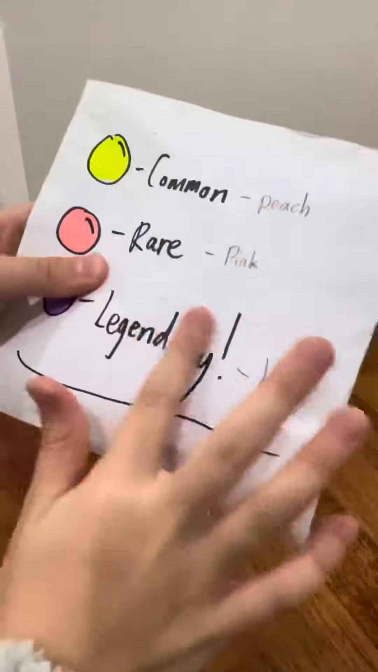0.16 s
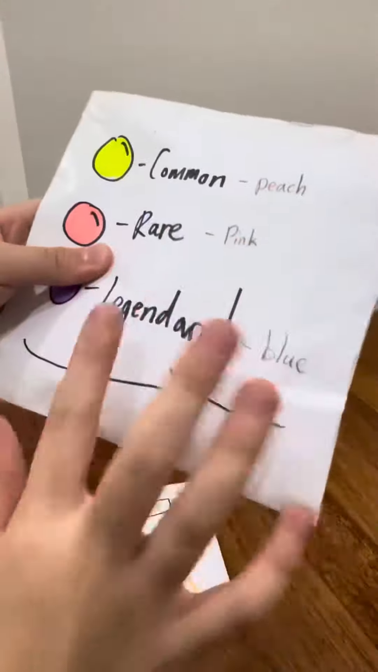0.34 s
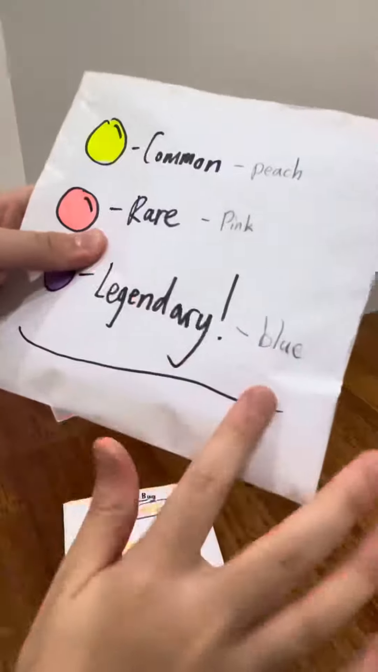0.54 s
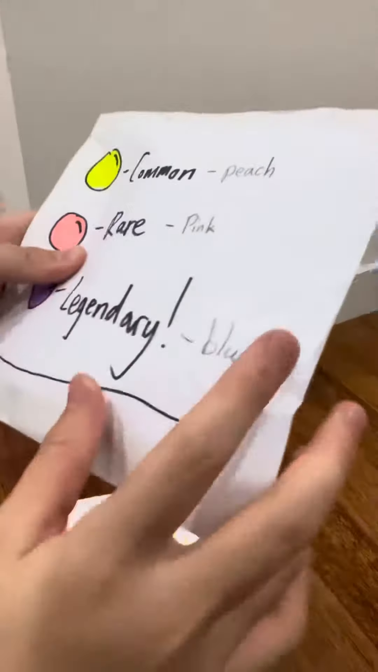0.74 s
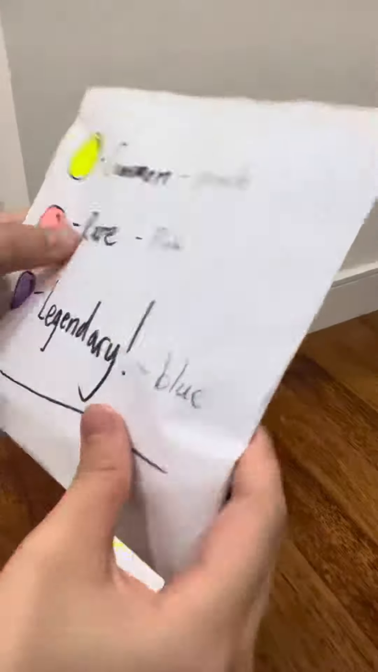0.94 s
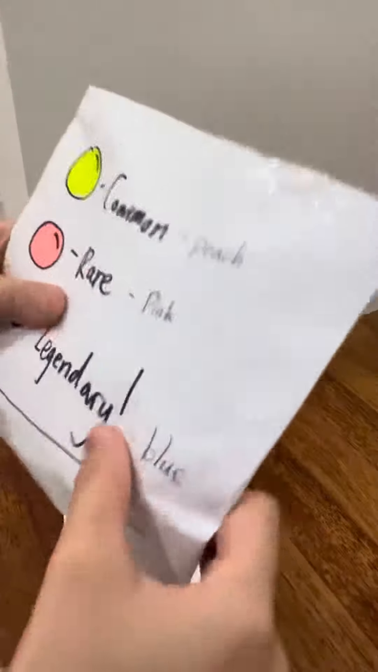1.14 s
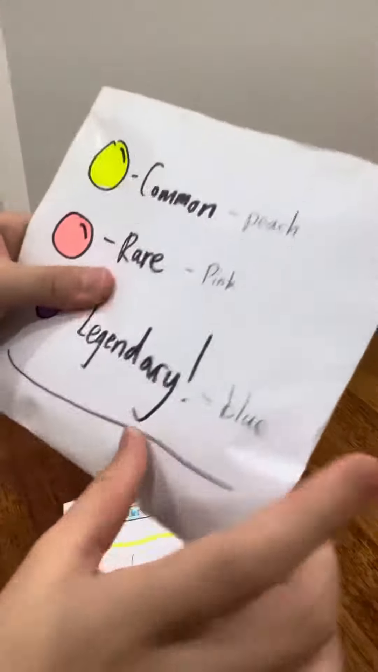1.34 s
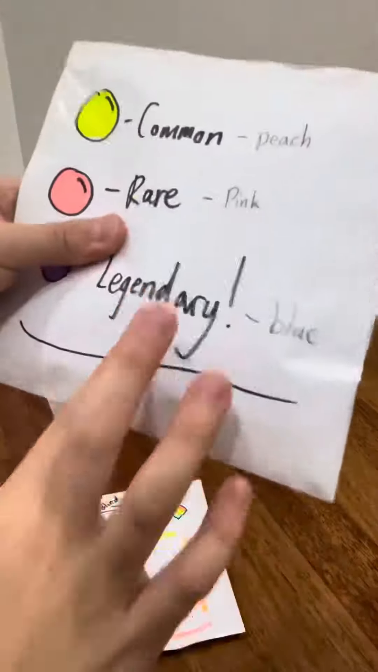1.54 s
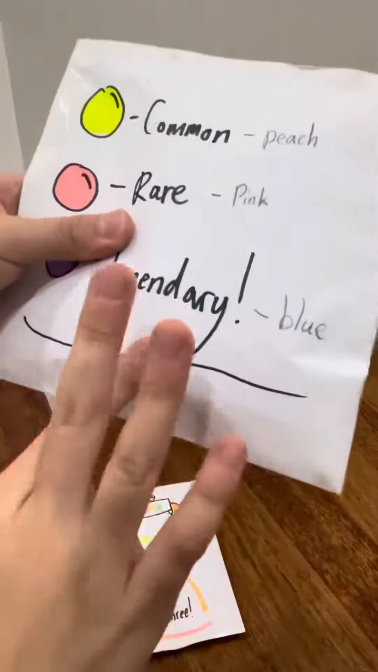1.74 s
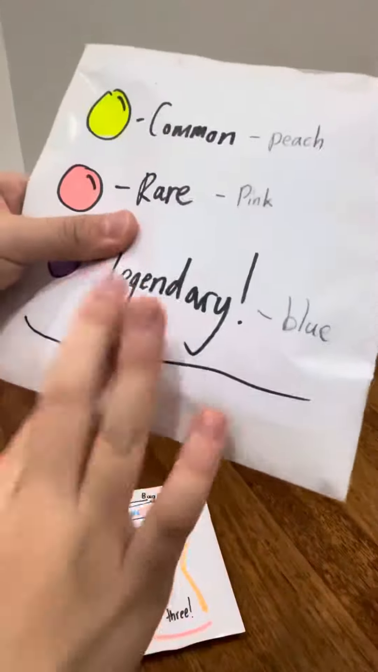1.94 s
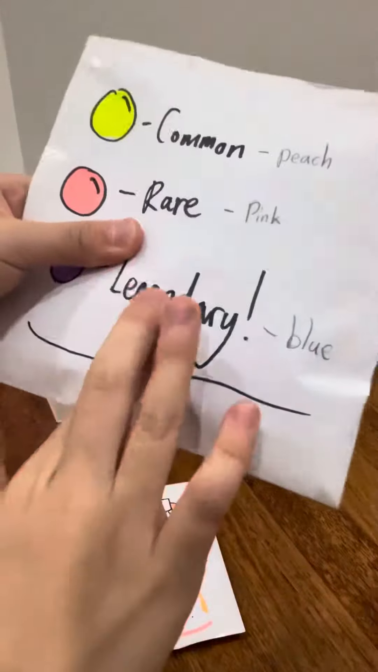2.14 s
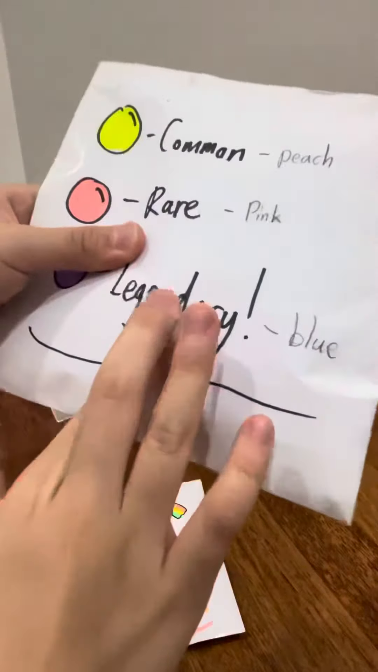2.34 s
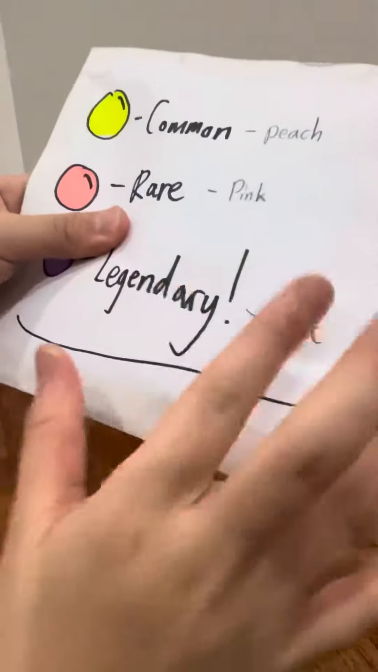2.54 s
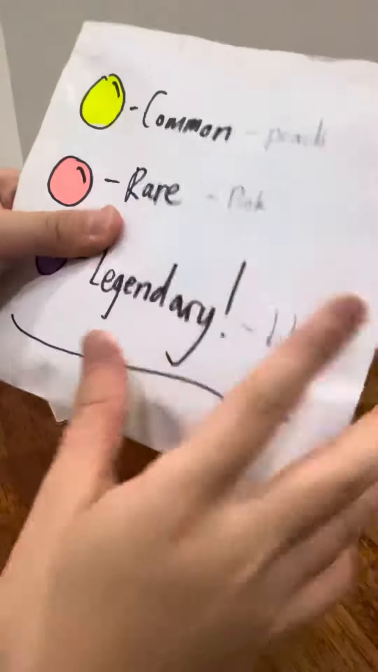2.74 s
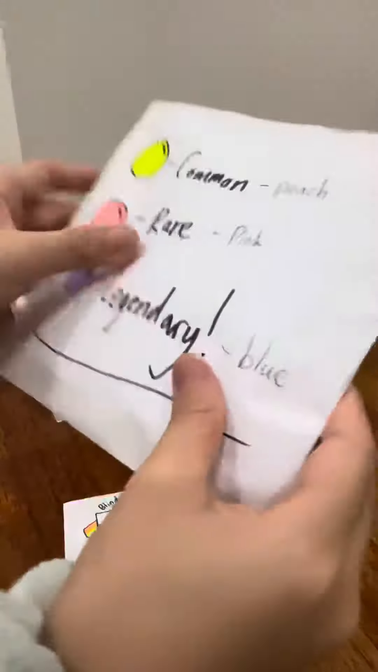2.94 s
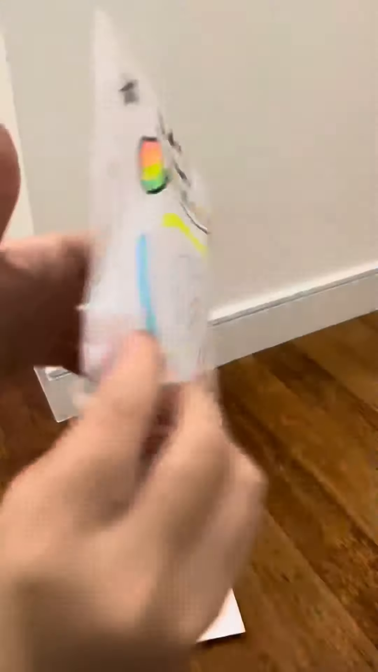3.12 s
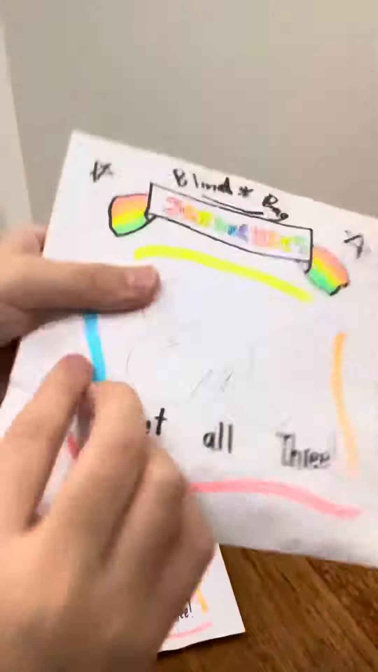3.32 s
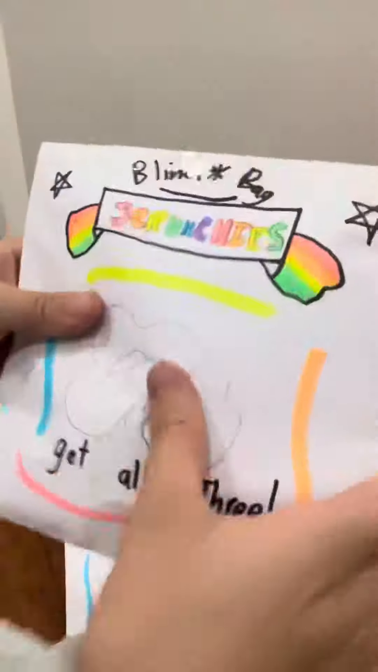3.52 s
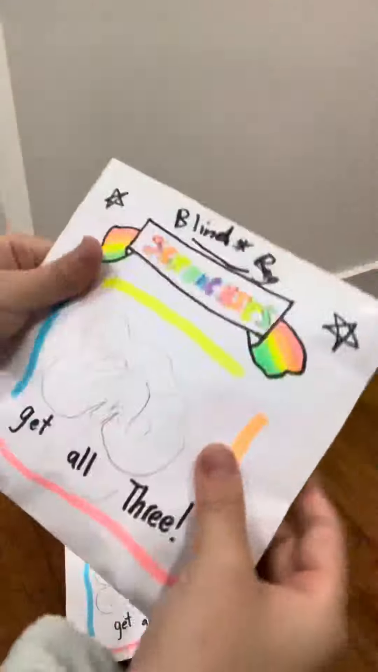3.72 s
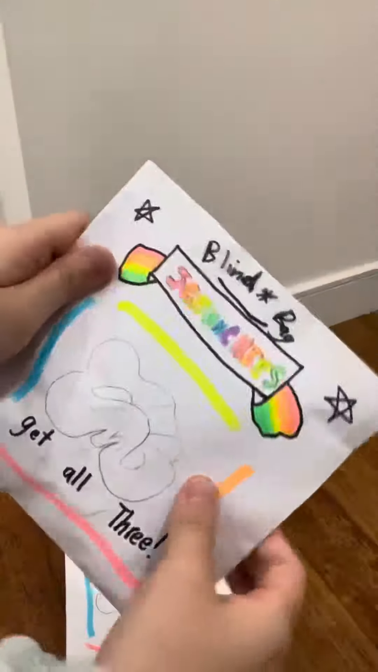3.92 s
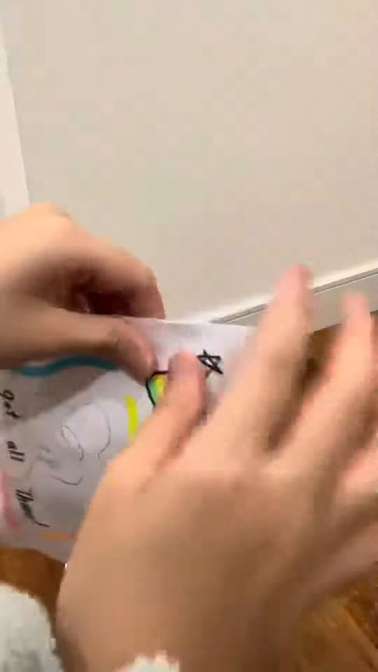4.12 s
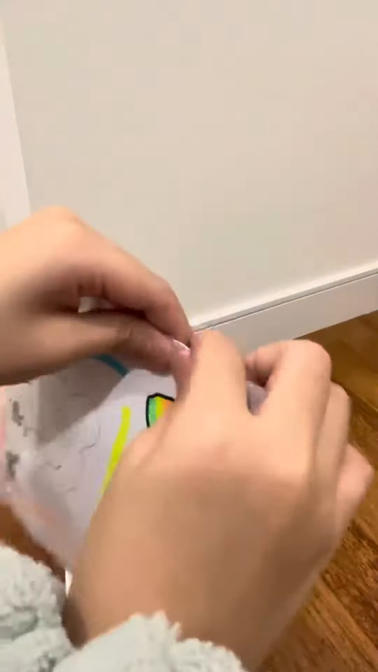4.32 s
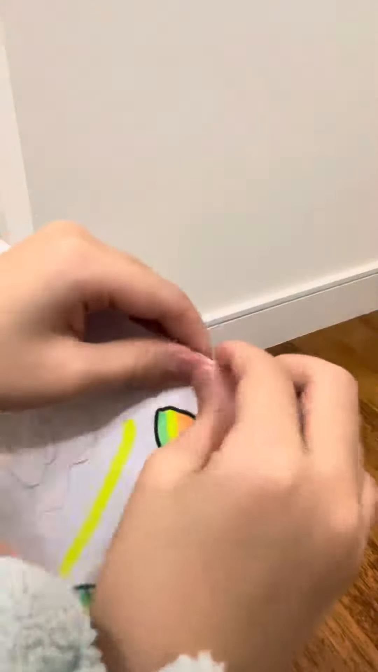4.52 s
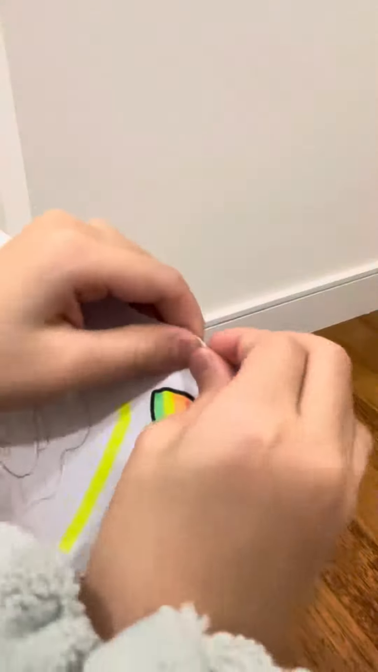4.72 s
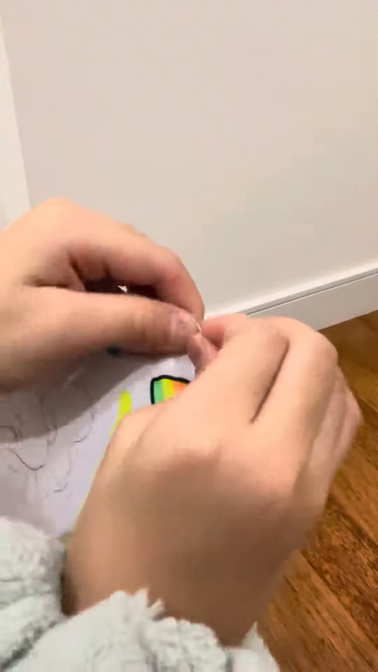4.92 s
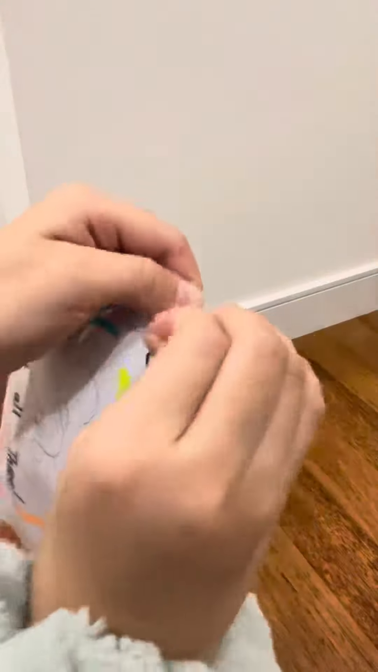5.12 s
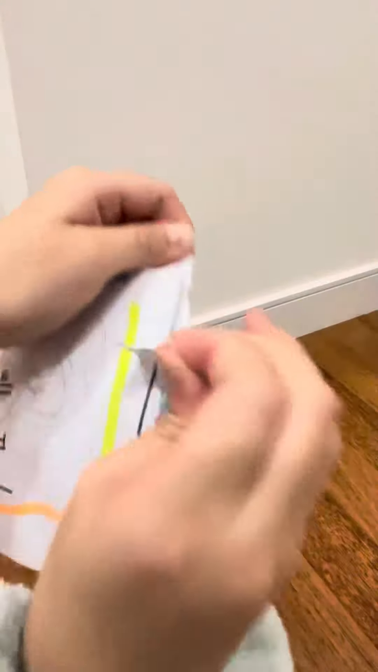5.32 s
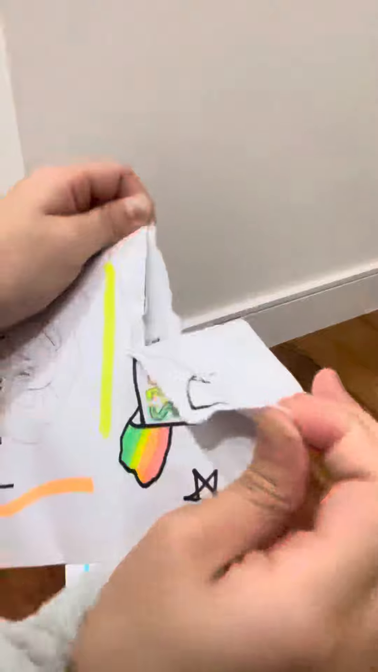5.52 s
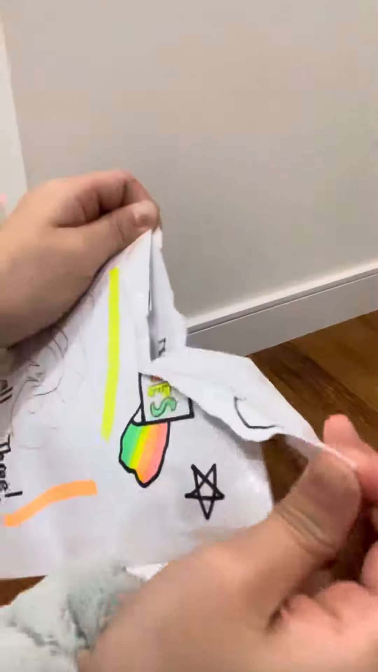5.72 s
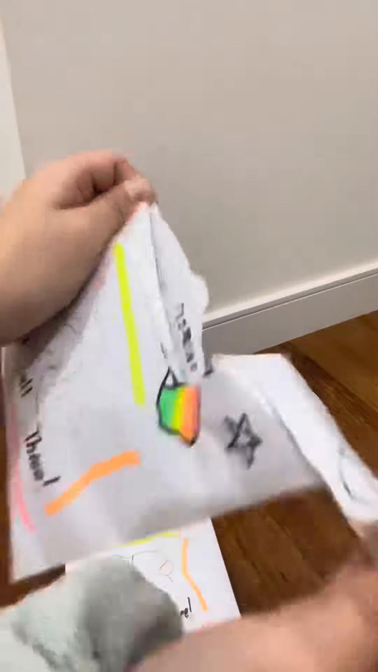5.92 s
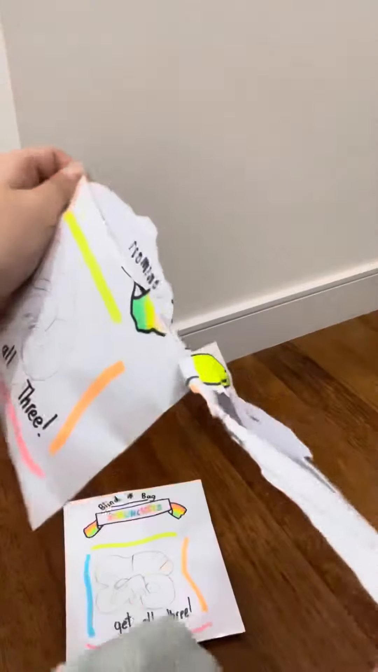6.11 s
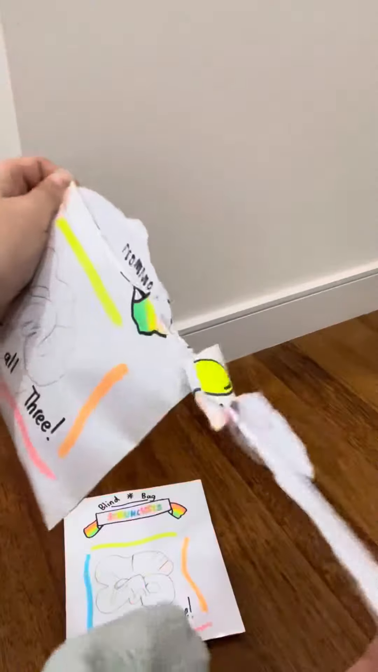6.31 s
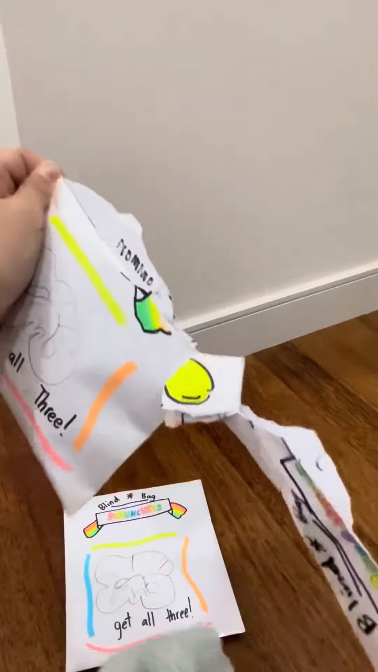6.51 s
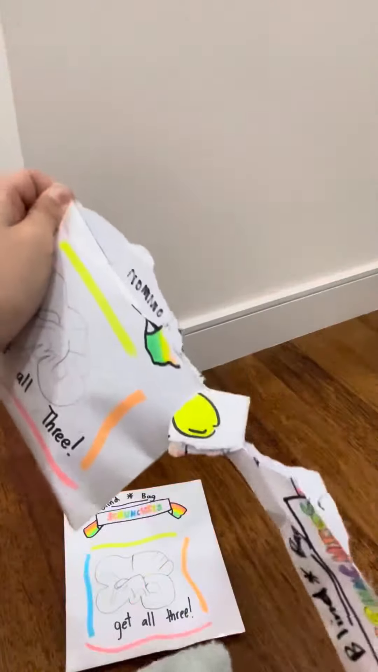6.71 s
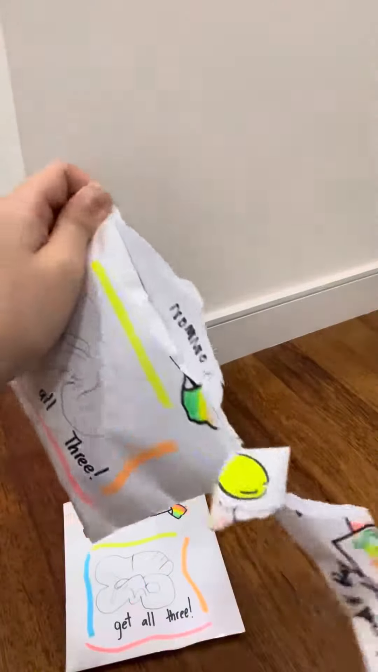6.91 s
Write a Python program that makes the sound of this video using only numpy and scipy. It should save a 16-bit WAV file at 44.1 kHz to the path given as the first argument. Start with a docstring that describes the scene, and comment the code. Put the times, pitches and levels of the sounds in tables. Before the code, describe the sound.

A stuffed paper packet is handled very close to a phone in a small bare room, over faint low rumble and slight hiss. A sharp tap and snap come at 0.1 s, then sparse light ticks and rubs; a very faint, steady mid-pitched tone lasts from about 0.5 to 1 s. From 0.8 to 1.4 s the paper flexes in a dense crackling cluster. Quiet isolated taps and soft air bumps follow until 2.7 s. Turning the packet brings busy rustling and hard snaps from 2.8 to 3.9 s, strongest near 3.6. Lighter shuffling leads to a pinch snap at 4.55. Ripping starts around 5.05 and surges to 5.4, continues thinly to 5.7, then a bright strong tear bursts at 5.9 and a brief sharp one at 6.3. Small crisp crinkles trail off to about 6.9 s, with a short diffuse echo.

```python
"""Over a faint low rumble two hands tap, turn, pinch and tear open a stuffed paper packet.
It lies close to a phone in a small bare room. Snaps are jolts of noise ringing through tuned filters;
sliding and tearing are noise broken into tiny bursts, and pushed air is a short, sagging low wave.
The walls answer with soft noise that fades, the rumble fills the pauses, and one faint tone sounds early on.
"""
import sys
import numpy as np
from scipy import signal
from scipy.fft import rfft, irfft, next_fast_len
from scipy.io import wavfile
from scipy.ndimage import uniform_filter1d

SR = 44100
rng = np.random.default_rng(int(sys.argv[2]) if len(sys.argv) > 2 else 0)


def transcribe(u):
    """Save the signal u as a 16-bit wav file named by the first command-line argument.

    u: samples, shape (n,) or (channels, n), limited to [-1, 1]; the rate is SR.
    q: integer samples, one column per channel.
    """
    v = np.clip(np.atleast_2d(u).T, -1, 1)
    q = np.round(v * 32767).astype(np.int16)
    wavfile.write(sys.argv[1], SR, q)


N = 306936  # length in samples, about 7 s


def amp(db):
    """Turn a level in dB into a plain multiplier."""
    return 10 ** (np.asarray(db) / 20)


def unit(x):
    """Scale x to an average strength (rms) of 1."""
    return x / np.sqrt(np.mean(x ** 2) + 1e-20)


def along(points, hz):
    """Read a curve of (f/Hz, value) points at the pitches hz, on a log pitch axis."""
    f, value = np.transpose(points)
    return np.interp(np.log(hz + 1), np.log(f + 1), value)


def level_over_time(points):
    """Multiplier per sample from (t/s, level/dB) points; practically silent outside them."""
    t, db = np.transpose(points)
    return amp(np.interp(np.arange(N) / SR, t, db, left=-120, right=-120))


def filtered(x, response):
    """Change the strength and phase of each pitch in x by response(hz)."""
    size = next_fast_len(N + SR // 2)  # spare room so that the end does not wrap to the start
    hz = np.fft.rfftfreq(size, 1 / SR)
    return irfft(rfft(x, size) * response(hz), size)[..., :N]


def coloured(x, spectrum):
    """Shape x by (f/Hz, level/dB) points, then scale it to rms 1."""
    return unit(filtered(x, lambda hz: amp(along(spectrum, hz))))


# How loud the low rumble is: t/s, level/dB
RUMBLE_LEVEL = [(0.0, -53), (0.48, -54), (5.46, -53.5), (5.62, -63), (6.96, -55.5)]
# Balance of pitches in the rumble: f/Hz, relative level/dB per Hz
RUMBLE_COLOUR = [(25, -53.5), (40, -1.5), (52, 9), (70, -3.5), (100, -5), (200, -16.5), (500, -43),
                 (900, -78.5)]
# Balance of pitches in the air and circuit hiss: f/Hz, relative level/dB per Hz
HISS_COLOUR = [(200, -5.5), (700, -10), (3000, -13.5), (8000, -22), (12000, -25)]
# A faint soft tone: start t/s, length/s, f/Hz, level/dB
SOFT_TONE = (0.465, 0.5, 576, -66)


def background():
    """Noise shaped into a wavering low rumble and a faint hiss, plus one brief sine tone."""
    start, length, hz, db = SOFT_TONE
    t = np.arange(N) / SR - start
    arch = np.sqrt(np.abs(np.sin(np.pi * np.clip(t / length, 0, 1))))  # rises and falls once
    tone = amp(db) * arch * np.sin(2 * np.pi * hz * t)
    rumble = level_over_time(RUMBLE_LEVEL) * coloured(rng.standard_normal((2, N)), RUMBLE_COLOUR)
    hiss = amp(-80.5) * coloured(rng.standard_normal((2, N)), HISS_COLOUR)
    return rumble + tone * [[1], [0]] + hiss  # the tone is on the first path only


CREAK_S, KICK = 0.0018, 2.03  # length of the creak before a crease gives way; jolt over the shaking
SMALL_DB, SMALL_FOLLOWS = 3.5, 0.4  # small panel over the middle one; its share of the brightness
PANEL_SCATTER = 0.081  # no two creases shake panels of quite the same size
TORN_S = 5.5  # from this time the torn edge replaces the crack panel

# Creases buckling and fingertips landing: t/s, middle panel peak level/dB,
# crack panel over middle/dB (brightness), large panel over middle/dB
CREASES = [(0.068, -36, 5.5, 7), (0.07, -21.5, -11, -5.5), (0.121, -30, -65, -9), (0.237, -51, -10, 2),
           (0.351, -58, 5.5, 2), (0.373, -37.5, 9, 0), (0.567, -48, -7, -4), (0.63, -47, 1, 1),
           (0.717, -40, -30.5, -5), (0.825, -33.5, -0.5, -3), (0.866, -18, 0.5, -17), (0.905, -25, -6, -6),
           (0.939, -28, -12.5, -9.5), (0.982, -31.5, -4.5, -3), (1.042, -43.5, -2.5, -11),
           (1.056, -25, -5.5, -5), (1.0827, -24.5, 14, -3.5), (1.105, -33, -29, 4),
           (1.141, -25.5, -5, -3.5), (1.165, -43.5, -9, -18), (1.236, -39, 7, -11),
           (1.246, -37.5, 10.5, -6), (1.265, -42, -21, -12), (1.278, -36, 6, -8), (1.283, -30.5, 7, -1),
           (1.318, -37.5, 8.5, -11), (1.403, -52, 14.5, -6), (1.534, -35, 3.5, 4), (1.694, -45.5, 3, 0),
           (1.936, -32.5, 1.5, -5), (2.1, -39.5, 4, 1), (2.17, -53.5, 5, -4), (2.244, -42, 4.5, -5.5),
           (2.339, -59, -10, -5), (2.702, -42.5, 0, -5), (2.755, -48.5, 19.5, 9.5), (2.807, -50, 11.5, -9),
           (2.845, -49, -24, 15), (2.904, -26.5, -7, -8.5), (2.933, -28, 0, -2.5), (3.072, -37.5, 7, 0.5),
           (3.096, -36.5, -23, -1.5), (3.161, -41, 5, 8.5), (3.216, -42, -7, 2.5), (3.281, -24.5, 6.5, -4),
           (3.321, -27, 3, 3), (3.329, -24, 8, -6), (3.357, -35, 2, 0.5), (3.419, -28, 21.5, -6),
           (3.453, -27, -14, -6.5), (3.498, -45, 3, 4), (3.511, -43, 13, 6), (3.528, -32.5, -2, 0),
           (3.561, -20.5, 1.5, -11), (3.575, -29, 13, 4), (3.598, -34, -8, -2.5), (3.618, -40.5, -6, 3),
           (3.633, -17.5, 0, -10), (3.715, -31, -8, -4.5), (3.862, -21.5, -10.5, -6.5), (3.9, -39, -12, 4),
           (3.912, -42, -7, 0), (3.93, -38, -1, 0.5), (4.024, -39.5, -25, -4), (4.182, -62, -14, 20),
           (4.22, -46, -27.5, 8.5), (4.276, -35.5, -26, -7.5), (4.313, -37, -3, -4),
           (4.318, -41.5, -3.5, -14), (4.342, -44.5, 2, 0), (4.409, -32.5, -1, -2), (4.548, -18.5, 8, -9.5),
           (4.757, -46.5, 7, 11), (4.862, -35.5, -66.5, -1.5), (4.906, -44.5, -32.5, -0.5),
           (4.93, -24, -22, -10.5), (5.051, -17, 5, -39), (5.108, -26, -6.5, -12.5), (5.133, -20, -5, -3.5),
           (5.153, -25, -20, -12), (5.214, -28.5, -13, -13), (5.222, -20.5, -0.5, -9),
           (5.265, -22, 12.5, -7.5), (5.272, -15.5, -20, -27), (5.286, -21, 1.5, -25),
           (5.306, -30, -22, -8), (5.487, -51, 21, -16), (5.495, -41, 23.5, -11), (5.513, -51.5, 26, -20),
           (5.538, -50.5, 21, -11), (5.562, -50, 26, -15), (5.603, -54, 38.5, -12), (5.615, -53, 22.5, -9),
           (5.655, -52.5, 30, -10), (5.662, -36, 28.5, 3.5), (5.703, -36.5, 12, -8), (5.745, -67.5, 39, -8),
           (5.806, -66.5, 50, -11), (5.831, -48.5, 19, -21), (5.853, -36.5, 19.5, 4),
           (5.889, -31.5, 12.5, -1.5), (5.896, -25.5, 14, -1.5), (5.905, -22, 21, -14.5),
           (5.918, -31, 17.5, -10.5), (5.934, -29, 11, 2), (5.958, -26, 8, -12), (6.255, -53, 15, -19),
           (6.275, -37, 26.5, -27), (6.335, -26, -7, -6.5), (6.499, -72, 37.5, -22),
           (6.564, -56.5, 22, -35), (6.628, -70.5, 29, -22), (6.714, -45, 20, -6.5),
           (6.762, -46.5, -38, -2.5), (6.803, -41, 10, 0), (6.811, -48, 27, -3), (6.851, -64, 30.5, 15.5),
           (6.871, -51.5, -1, -8)]
# Panels in the order middle, small, crack, large: typical f/Hz, sharpness, t/s for shaking to drop 60 dB
PANEL_SIZES = [(1078, 2.7, 0.0062), (2217, 1.34, 0.015), (5900, 1.07, 0.012), (310, 0.48, 0.044)]
# The loose edge of the torn sheet, cracking brighter: typical f/Hz, sharpness, t/s to drop 60 dB
TORN_EDGE = (8000, 0.94, 0.012)


def snaps():
    """Each snap creaks in softly, then shakes panels of several sizes; small ones build up first."""
    out = np.zeros((2, N + SR))
    t = np.arange(SR // 25) / SR
    creak = np.clip(t / CREAK_S, 0, 1) ** 3
    for start, db, bright_db, large_db in CREASES:
        middle, small, crack, large = PANEL_SIZES
        panels = [middle, small, crack if start < TORN_S else TORN_EDGE, large]
        parts_db = [0, SMALL_DB + SMALL_FOLLOWS * bright_db, bright_db, large_db]
        first = round(start * SR)
        for (hz, sharp, t60), part_db in zip(panels, parts_db):
            build_up = 1 - np.exp(-t * hz / 0.47)
            shake = rng.standard_normal((2, len(t))) * creak * amp(-60 * t / t60) * build_up
            shake[:, round(CREAK_S * SR)] += KICK * rng.choice([-1, 1], size=2)  # the instant of buckling
            scatter = np.exp(PANEL_SCATTER * np.clip(rng.standard_normal(), -2, 2))
            b, a = signal.iirpeak(hz * scatter, sharp, fs=SR)
            ring = signal.lfilter(b, a, signal.lfilter(b, a, shake))
            ring = ring / np.abs(ring).max(axis=1, keepdims=True)
            out[:, first:first + len(t)] += amp(db + part_db) * ring
    return out[:, :N]


# How slowly the room falls silent: f/Hz, t/s for the echo to drop 60 dB
ROOM_FADE = [(150, 0.6), (1000, 0.29), (5000, 0.44), (12000, 0.32)]


def walls(x):
    """The room's blurred answer: power in each band builds after a gap, then dies at its own speed."""
    hz, t, bands = signal.stft(x[0], SR, nperseg=256)
    power = uniform_filter1d(np.abs(bands) ** 2, size=7, axis=0)  # many directions blur the fine colour
    lag = t[:200]
    build_up = (1 - np.exp(-(lag / 0.0025) ** 2)) ** 2
    fade = amp(-2 * 60 * lag / along(ROOM_FADE, hz)[:, None])  # doubled because this is power
    tail = build_up * fade
    tail = tail / tail.sum(axis=1).mean()
    echo_power = np.abs(signal.fftconvolve(power, tail, axes=1)[:, :len(t)])
    noise = signal.stft(rng.standard_normal((2, N)), SR, nperseg=256)[2]
    noise = noise / np.sqrt(np.mean(np.abs(noise) ** 2))
    return signal.istft(np.sqrt(echo_power) * noise, SR, nperseg=256)[1][:, :N]


# The packet's face pushes air at the microphone ports: t/s, level/dB before the swell and fade
AIR_PUSHES = [(0.07, -33.5), (0.373, -37), (0.866, -35), (1.085, -35), (1.278, -31), (1.535, -36.5),
              (1.938, -33.5), (2.107, -38.5), (2.244, -38), (2.704, -31), (3.073, -34.5), (3.162, -37.5),
              (3.514, -27), (3.607, -30), (4.545, -40), (5.132, -32.5), (5.898, -29.5), (6.322, -32)]


def puffs():
    """A few slow cycles of pushed air, quick at first, then sagging in pitch; no two quite alike."""
    out = np.zeros(N + SR)
    t = np.arange(SR // 5) / SR
    cycles = 50 * t + 1.4 * (1 - np.exp(-t / 0.009))
    swell = 1 - np.exp(-t / 0.0072)
    stretches = np.exp(0.16 * rng.standard_normal(len(AIR_PUSHES)))  # speeds up or slows each puff
    for (start, db), stretch in zip(AIR_PUSHES, stretches):
        fade = amp(db - 60 * stretch * t / 0.23)
        first = round(start * SR)
        out[first:first + len(t)] += fade * np.sin(2 * np.pi * stretch * cycles) * swell
    return out[:N]


def grains(rate, spread_db, life, rise=1e-5):
    """Loudness curve of random bursts, rate a second, each swelling in rise and dying in life seconds."""
    sizes = amp(spread_db * np.clip(rng.standard_normal(N), -2, 2))
    kicks = (rng.random(N) < rate / SR) * sizes
    swells = signal.lfilter([1], [1, -np.exp(-1 / (rise * SR))], kicks)
    return unit(signal.lfilter([1], [1, -np.exp(-1 / (life * SR))], swells))


def crinkles(count, centre_hz, cycles):
    """Tiny buckles scattered over time on both paths, each ringing a few cycles at its own pitch."""
    when, detune = rng.random(count), rng.random((2, count, 1))
    spread, size = rng.standard_normal((2, count, 1))
    hz = centre_hz * np.exp(0.7 * spread)
    k = np.arange(240)  # samples in each ring
    turns = hz * k / SR
    fade = amp(1.1 * np.clip(size, -2, 2)) * np.exp(-turns / cycles)
    rings = fade * np.sin(2 * np.pi * turns * (1 + 0.045 * detune))  # the paths differ a little in pitch
    spots = ((when * N).astype(int)[:, None] + k).ravel()
    return unit(np.array([np.bincount(spots, ring.ravel(), N + 240)[:N] for ring in rings]))


FLEX_DB = 5  # most that the bending sheet lifts or dips a pitch


def flexing(x):
    """The bending sheet shifts its favoured pitches, in patches some hundred Hz and tens of ms wide."""
    bands = signal.stft(x, nperseg=256)[2]
    wander = uniform_filter1d(rng.standard_normal(bands.shape[1:]), size=2, axis=0)  # across pitch
    wander = uniform_filter1d(wander, size=9, axis=1)  # across time
    return signal.istft(bands * amp(FLEX_DB * np.tanh(unit(wander))), nperseg=256)[1][:, :N]


# Balance of pitches in the packet's body: f/Hz, relative level/dB per Hz
PACKET_COLOUR = [(60, -17.5), (250, -11.5), (450, -14.5), (780, -17), (1200, -11.5), (1550, -21),
                 (2500, -13), (4000, -21), (6000, -22), (9000, -66)]
# Balance of pitches in the paper fibres: f/Hz, relative level/dB per Hz
FIBRE_COLOUR = [(1500, -74.5), (3500, 0), (5000, -1), (7000, -1), (9000, -0.5), (16000, -3.5)]


def crackle(body_gain, fibre_gain, bursts, buckles, steady):
    """The same bursts shake the packet (low) and its fibres (high); fibres also hiss steadily."""
    low_noise, high_noise = rng.standard_normal((2, 2, N))  # two unrelated paths each
    low = coloured(flexing(bursts * low_noise), PACKET_COLOUR)
    high = coloured((bursts + steady) * high_noise, FIBRE_COLOUR)
    return body_gain * unit(low + buckles) + fibre_gain * high


ATTACK_S = 0.012  # every stroke swells in over this time
SAG_DB_PER_S, RELEASE_DB_PER_S = 15.5, 353.5  # slow sag, and the extra drop once it lets go


def strokes(rows):
    """Body and hiss loudness: each sliding stroke swells in, sags while it lasts, then lets go."""
    out = np.zeros((2, N))
    for start, length, *levels_db in rows:
        first = round(start * SR)
        t = np.arange(min(N - first, SR)) / SR
        fall_db = -SAG_DB_PER_S * t - RELEASE_DB_PER_S * np.clip(t - length, 0, None)
        shape = np.clip(t / ATTACK_S, 0, 1) * amp(fall_db)
        out[:, first:first + len(t)] += amp(levels_db)[:, None] * shape
    return out


# Fingers and paper sliding: start t/s, length/s, body level/dB, fine hiss level/dB (before swell and sag)
SLIDES = [(.08, 0.079, -61, -55), (.385, 0.1, -59.5, -52), (.588, 0.23, -57, -56.5), (.82, 0.32, -48, -54),
          (1.05, 0.11, -53.5, -59), (1.228, 0.014, -43, -45.5), (1.28, 0.033, -49, -52),
          (1.95, 0.024, -71, -62.5), (2.76, 0.059, -55, -56.5), (2.84, 0.11, -47.5, -57.5),
          (3.075, 0.022, -49, -49.5), (3.135, 0.14, -53.5, -58), (3.3, 0.077, -45, -44.5),
          (3.42, 0.12, -47, -85), (3.563, 0.072, -35.5, -44.5), (3.72, 0.11, -52.5, -58),
          (3.865, 0.11, -56, -62.5), (4.005, 0.025, -51, -61), (4.085, 0.019, -62, -55.5),
          (4.205, 0.26, -55.5, -58.5), (4.56, 0.24, -62, -66.5), (4.96, 0.57, -60, -73.5),
          (5.72, 0.3, -59.5, -53), (6.05, 0.19, -64.5, -61), (6.2, 0.079, -64, -52.5),
          (6.37, 0.08, -63.5, -66.5), (6.48, 0.51, -73, -67.5), (6.81, 0.016, -61.5, -54.5)]


def rustle():
    """Sliding hiss, roughened by small creases that give way in clumps."""
    body, fine = strokes(SLIDES)
    slow = grains(90, spread_db=2.5, life=0.004, rise=0.001)
    quick = grains(360, spread_db=2.5, life=0.0015)
    clumps = unit(0.4 + 0.9 * slow + 0.3 * quick)
    rough = body / (body + 0.39 * fine + 1e-9)  # strokes that are mostly hiss slide smoothly
    bursts = 1 + rough * (clumps - 1)
    buckles = 0.57 * crinkles(count=700, centre_hz=978, cycles=0.59)
    return crackle(body, fine, bursts, buckles, steady=0.76)


RIP_BODY_DB, OPENS_DB_PER_S, OPEN_DB = -2, 7, -7  # body over hiss: start, fall per second, lowest

# The rip running through the sheet, one list for each pull: t/s, fibre hiss level/dB
PULLS = [
    [(5.05, -26), (5.085, -31.5), (5.098, -37.5), (5.112, -32.5), (5.138, -26), (5.152, -38), (5.174, -40),
     (5.2, -44), (5.234, -35.5), (5.264, -40)],
    [(5.265, -27.5), (5.329, -23), (5.355, -26), (5.38, -28), (5.41, -31), (5.425, -51), (5.485, -64)],
    [(5.49, -72), (5.5, -38.5), (5.535, -39.5), (5.59, -38), (5.62, -40.5), (5.668, -42), (5.677, -48)],
    [(5.815, -49), (5.855, -36), (5.897, -19.5), (5.935, -23), (5.967, -32.5), (6.012, -35), (6.05, -68)],
    [(6.275, -36.5), (6.282, -21), (6.293, -28), (6.305, -24), (6.324, -19), (6.37, -48.5)],
]


def tears():
    """The rip slips about 100 times a second over parting fibres; the packet booms less as it opens."""
    hiss = sum(level_over_time(pull) for pull in PULLS)
    since = np.arange(N) / SR - PULLS[0][0][0]  # seconds from the first pull
    body = hiss * amp(np.clip(RIP_BODY_DB - OPENS_DB_PER_S * since, OPEN_DB, RIP_BODY_DB))
    slips = grains(100, spread_db=0.5, life=0.0065)
    fibres = grains(750, spread_db=3, life=0.00098)
    buckles = 0.066 * crinkles(count=1500, centre_hz=1890, cycles=11.0)
    return crackle(body, hiss, 0.41 + 0.77 * slips + 0.5 * fibres, buckles, steady=0.039)


# How alike the two ports hear each pitch: f/Hz, likeness (1 = the same)
LIKENESS = [(150, 0.99), (400, 0.88), (750, 0.63), (1900, 0.97), (2700, 0.9), (3600, 0.35), (6000, 1),
            (7000, 0.92), (9500, 1), (11600, 0.71), (12500, 0.93)]
# Level of the left port over the right: f/Hz, level/dB
LEFT_LOUDER = [(150, -0.5), (380, 2), (1300, 0.3), (3500, -2), (8000, 0)]
# How far the left port leads the right: f/Hz, phase/radians
LEFT_LEADS = [(300, 0), (750, -.3), (1400, -.2), (2000, .15), (3200, .8), (4400, 1.8), (5000, 4),
              (5600, 5.9), (6200, 6.5), (8000, 8.7), (9200, 9.4), (10400, 10.5), (12200, 12.6)]


def ports(paths):
    """One path reaches both microphone ports alike, the other in opposition; level and phase differ."""
    def mix(hz):
        turn = np.arccos(np.clip(along(LIKENESS, hz), 0, 0.997)) / 2
        return np.array([np.cos(turn), np.sin(turn)])

    def differ(hz):  # half of each difference goes to either port
        level = amp(np.outer([0.5, -0.5], along(LEFT_LOUDER, hz)))
        return level * np.exp(0.5j * np.outer([1, -1], along(LEFT_LEADS, hz)))

    common, apart = filtered(paths, mix)
    return filtered(np.array([common + apart, common - apart]), differ)


def scene():
    """The paper, its echo, pushed air and the room's floor, as both ports hear them."""
    floor = background()
    paper = snaps() + rustle() + tears()
    echo = amp(-15.5) * walls(paper)
    air = puffs() * [[1], [0]]  # slow pressure is on the path that reaches both ports alike
    return ports(floor + paper + echo + air)


LOW_CUT_HZ, TOP_HZ = 24, 16400  # bass is cut around the first; nothing is kept above the second

# Treble colour of the whole sound, a peak near 10.5 kHz, then a steep fall: f/Hz, level/dB
TREBLE_COLOUR = [(5500, 2), (8500, 5.5), (9600, 8.5), (10500, 15.5), (11400, 8), (12300, -1.5),
                 (13400, -11), (14200, -47), (16000, -58.5)]


def record(dry):
    """Cut the deepest bass, colour the treble, round off loud peaks, limit the band."""
    def tone_balance(hz):
        bass_cut = (1j * hz / (LOW_CUT_HZ + 1j * hz)) ** 2
        return amp(along(TREBLE_COLOUR, hz)) * bass_cut

    heard = filtered(dry, tone_balance)
    rounded = heard / (1 + np.abs(heard / 0.9) ** 4) ** (1 / 4)  # never passes 0.9
    return filtered(rounded, lambda hz: hz < TOP_HZ)


dry = scene()
out = record(dry)
transcribe(out)
```